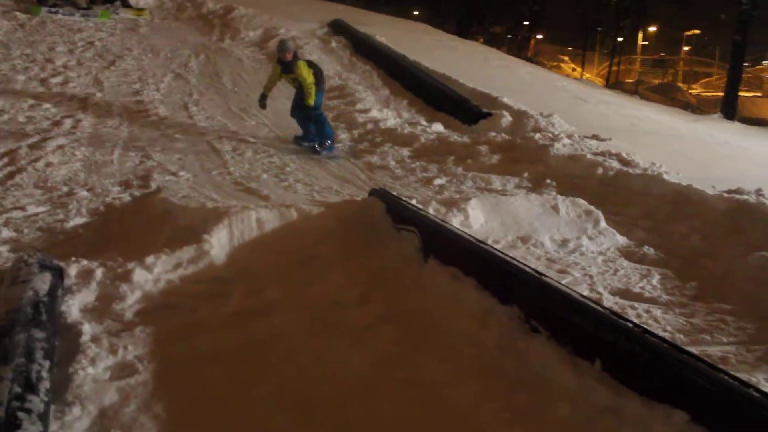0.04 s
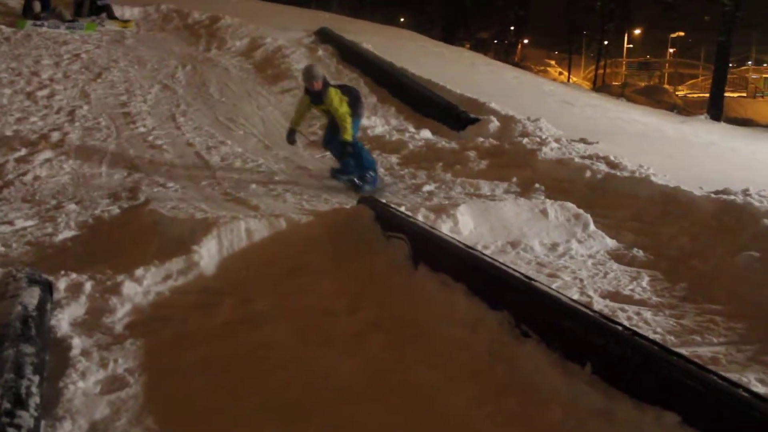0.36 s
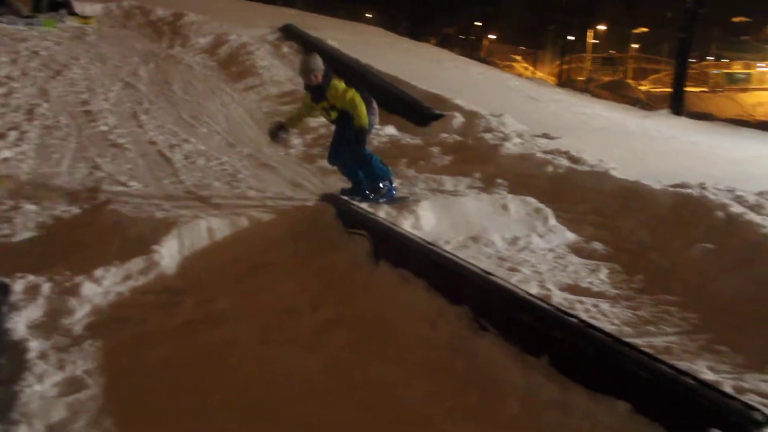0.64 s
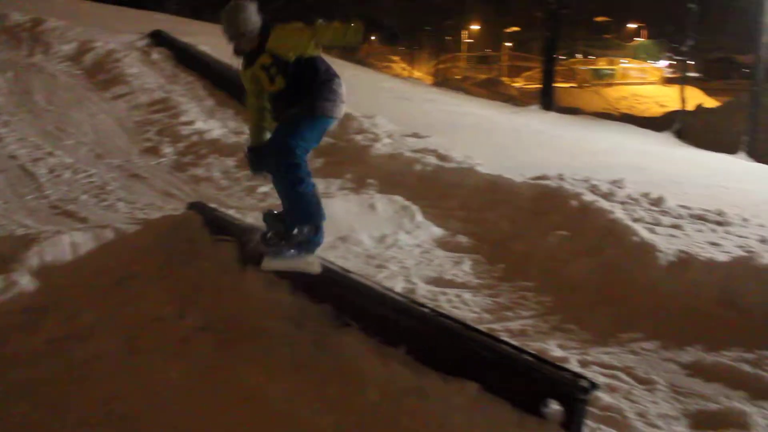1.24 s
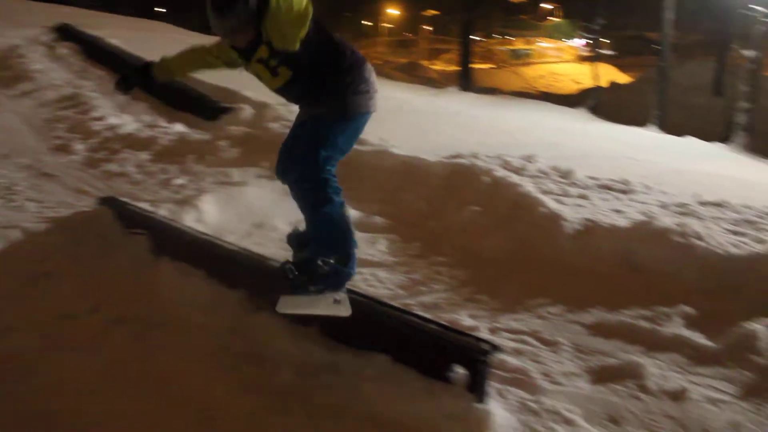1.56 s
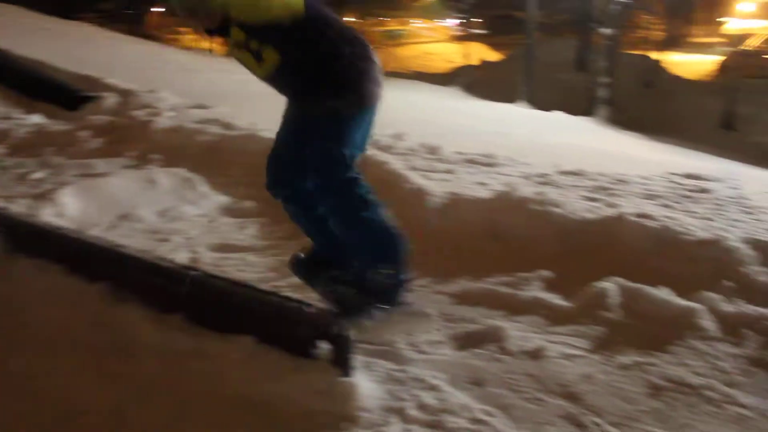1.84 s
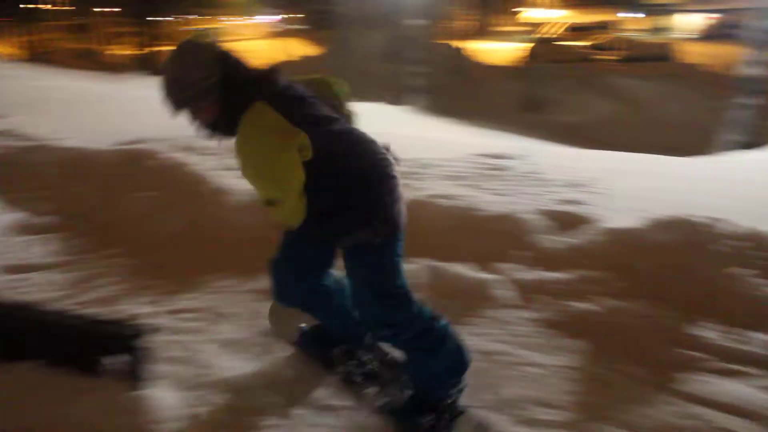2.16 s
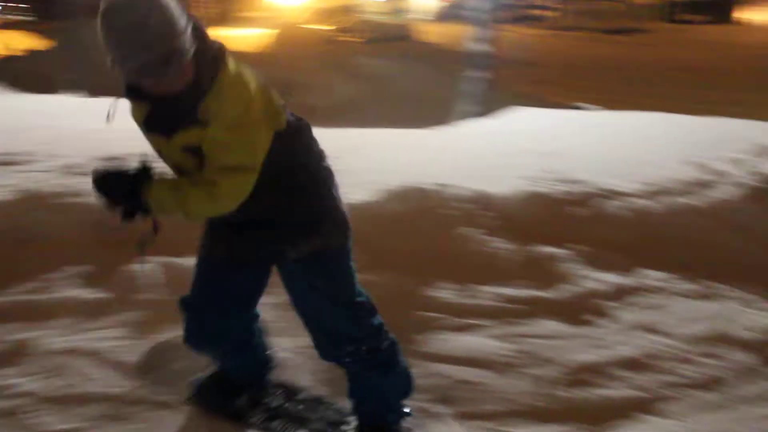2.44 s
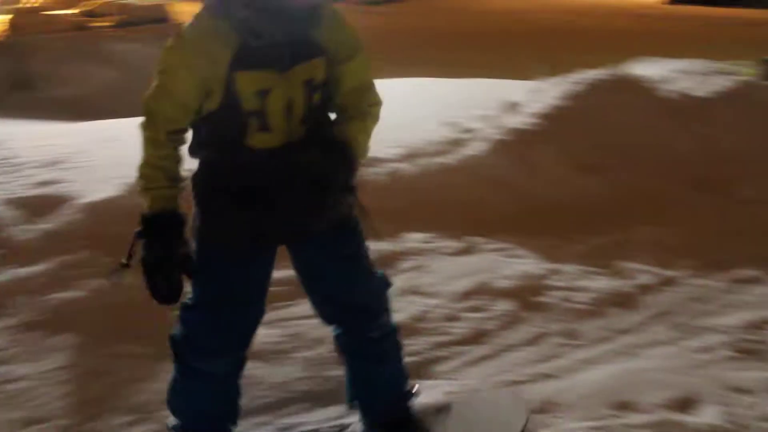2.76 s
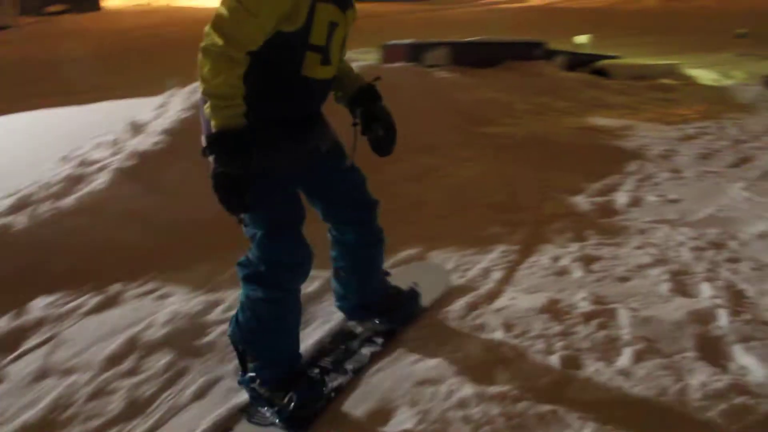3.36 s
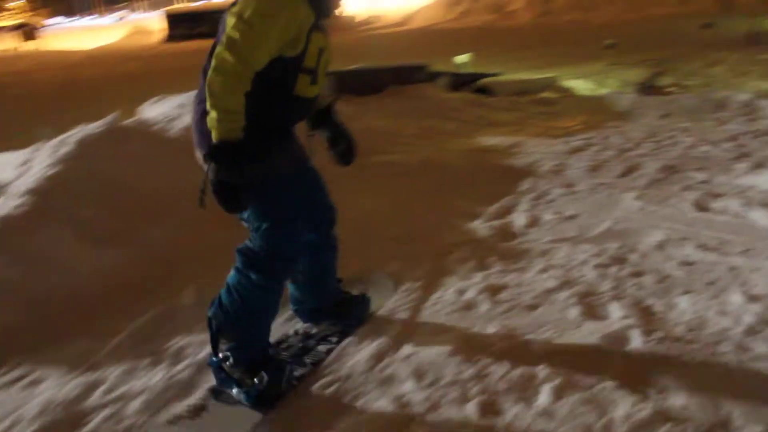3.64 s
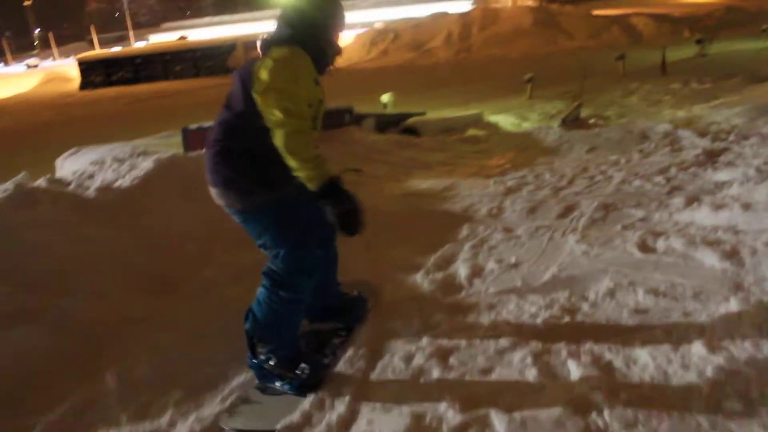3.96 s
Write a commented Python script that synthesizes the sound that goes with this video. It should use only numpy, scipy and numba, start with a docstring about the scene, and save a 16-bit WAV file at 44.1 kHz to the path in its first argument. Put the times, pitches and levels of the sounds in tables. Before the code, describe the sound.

Out in the open air, a snowboard glides closer with creaking bindings, hits a rail and slides along it with a growing scrape. A heavy landing follows, then gritty carving and spraying snow right beside the wind-buffeted microphone.

```python
"""A snowboard hisses and rumbles over hard snow toward a close listener, jumps onto a box rail,
scrapes along it, lands and skids away. Snow and rail are grainy friction; boots and bindings
creak in runs of tiny slips as the weight shifts. The knocks on the rail and the landing thud
overload the microphone, and wind buffets it as the rider passes. Open night air, no room."""
import sys
import numpy as np
from scipy import signal
from scipy.fft import rfft, irfft
from scipy.io import wavfile
from numba import njit

SR = 44100
rng = np.random.default_rng(int(sys.argv[2]) if len(sys.argv) > 2 else 0)


def output_pcm(signal):
    """Save a mono or channel-first signal as 16-bit PCM at the path in sys.argv[1].

    Samples are clipped to [-1, 1] before scaling.
    """
    pcm = np.clip(np.atleast_2d(signal).T, -1, 1) * 32767
    wavfile.write(sys.argv[1], SR, np.round(pcm).astype(np.int16))


N = 176400
T = np.arange(N) / SR
SHORT = T[:8192]  # time axis of one hit


def from_db(db):
    """Decibels to gain."""
    return 10 ** (np.asarray(db) / 20)


def rms_one(x):
    """Scale to unit power."""
    return x / np.sqrt(np.mean(x ** 2) + 1e-20)


def peak_at(x, db):
    """Scale to a peak level."""
    return from_db(db) * x / np.abs(x).max()


def level(rows, column=1, fade_s=0.0064):
    """Fader ride along a dB curve, dying away beyond its ends."""
    rows = np.array(rows)
    outside_s = np.maximum(0, np.maximum(rows[0, 0] - T, T - rows[-1, 0]))
    return from_db(np.interp(T, rows[:, 0], rows[:, column])) * np.exp(-outside_s / fade_s)


def add(out, start_s, sound):
    """Mix a sound in at a time."""
    i = int(np.clip(start_s * SR, 0, N - 1))
    out[i:i + len(sound)] += sound[:N - i]


def drift(hz):
    """Slow random wander of about unit spread."""
    hop, warm_up = 40, 2000
    r = np.exp(-2 * np.pi * hz * hop / SR)
    noise = rng.standard_normal(N // hop + warm_up + 2)
    slow = signal.lfilter([1], [1, -2 * r, r * r], noise)[warm_up:]
    return np.interp(np.arange(N) / hop, np.arange(len(slow)), rms_one(slow))


def colour(x, points):
    """Minimum-phase EQ through (Hz, dB) points, rolling off beyond them; unit power."""
    hz, db = np.transpose(points)
    f = np.maximum(np.arange(N // 2 + 1) * SR / N, 1)
    gain = from_db(np.interp(np.log(f), np.log(hz), db))
    gain /= np.hypot(1, (hz[0] / 2 / f) ** 2) * np.hypot(1, (f / hz[-1] / 2) ** 2)
    cepstrum = irfft(np.log(gain), N)
    cepstrum[N // 2:] = 0  # no ringing ahead of an attack
    return rms_one(irfft(rfft(x) * np.exp(2 * rfft(cepstrum)), N))


def lowpass(x, hz):
    """Soften above a frequency."""
    return signal.sosfilt(signal.butter(2, hz, fs=SR, output="sos"), x + 1e-18)


def resonate(x, hz, width_hz):
    """Two-pole resonance, gain 1 at its peak."""
    r = np.exp(-np.pi * width_hz / SR)
    feedback = [1, -2 * r * np.cos(2 * np.pi * hz / SR), r * r]
    return signal.lfilter(np.array([1, 0, -1]) * (1 - r * r) / 2, feedback, x + 1e-18)


@njit
def sweep(x, hz, width_hz):
    """Resonance whose centre follows a curve."""
    r = np.exp(-np.pi * width_hz / SR)
    state, out = 0j, np.zeros(len(x))
    for i in range(len(x)):
        state = x[i] + r * np.exp(2j * np.pi * hz[i] / SR) * state
        out[i] = 2 * (1 - r) * state.real
    return out


def wavering_ring(x, resonances_hz, width_hz, detune=0.035, swell_db=4):
    """Resonances that each swell, fade and shift as the contact point travels; unit power."""
    out = np.zeros(N)
    for hz in resonances_hz:
        centre_hz = hz * np.exp(detune * drift(hz=5))
        out += sweep(x, centre_hz, width_hz) * from_db(swell_db * drift(hz=6.5))
    return rms_one(out)


def friction(eq, grains_per_s, spread_db, grit, flutter_db, flutter_hz):
    """Grains on smooth hiss, fluttering with contact pressure; grit is the grains' share of power."""
    sizes = from_db(spread_db * np.minimum(rng.exponential(1, N), 4)) * rng.choice([-1, 1], N)
    grains = rms_one(sizes * (rng.random(N) < grains_per_s / SR))
    force = np.sqrt(grit) * grains + np.sqrt(1 - grit) * rng.standard_normal(N)
    return colour(force * from_db(flutter_db * drift(flutter_hz)), eq)


# Tone of the night air. Each row: frequency in Hz, relative level in dB.
AIR_EQ = [(25, -4.5), (500, -8), (1500, -24.5), (5000, -40), (16000, -20)]
# Swell of wind on the microphone. Each row: time in seconds, level in dB.
WIND_LEVELS = [(2.4, -47), (2.62, -35), (2.7, -26.5), (2.82, -28.5), (2.94, -29.5), (3.12, -34),
               (3.33, -50), (3.45, -39), (4, -41.5)]


def air():
    """A faint outdoor bed, and low buffeting as the rider passes."""
    gust_eq = [(25, -5), (50, 0), (95, 4.5), (150, -3.5), (260, -13)]
    gusts = colour(rng.standard_normal(N), gust_eq)
    bed = colour(rng.standard_normal(N), AIR_EQ)
    return from_db(-52) * bed + gusts * level(WIND_LEVELS)


# Lone snaps of crust and bindings. Each row: start in seconds, peak in dB, resonance in Hz.
SNAP_HITS = [(0.223, -18.5, 2830), (0.58, -20, 7400), (0.921, -16, 3200), (1.07, -23.5, 1980),
             (2.135, -12.5, 1010), (2.151, -13.5, 1720), (2.592, -6, 1720), (3.019, -6.5, 770),
             (3.2852, -13, 1310), (3.3152, -9, 1140), (3.332, -10, 1440), (3.362, -8.5, 1350),
             (3.756, -13, 2610), (3.937, -9, 720)]


def snaps(tail_db=-10.5, tail_s=0.00093):
    """Dry cracks: a sudden release and a brief scatter through one broad resonance."""
    out = np.zeros(N)
    for start, db, hz in SNAP_HITS:
        click = from_db(tail_db) * rng.standard_normal(len(SHORT)) * np.exp(-SHORT / tail_s)
        click[0] = 1
        snap = lowpass(resonate(click, hz, width_hz=hz), 2 * hz)
        add(out, start, peak_at(snap, db))
    return out


# Creaks of the bindings, and of the board on the rail during the slide. Each row: start in seconds, length in
# seconds, slips per second, level in dB, # main resonance in Hz, treble lift in dB.
CREAK_RUNS = [(0.402, 0.039, 218, -24, 2700, 7), (0.558, .02, 152, -19, 2970, 12),
              (.728, 0.04, 65, -14.5, 2820, 9), (0.779, 0.04, 119, -16, 2720, 6.5),
              (0.9435, 0.024, 220, -13.5, 2700, 15), (0.9812, .042, 213, -12, 2850, 10.5),
              (1.582, 0.0234, 156, -10.5, 3060, 8), (1.672, .062, 159, -12, 2900, 8),
              (2.023, 0.037, 230, -20, 2700, -7), (2.058, .009, 550, -12, 1860, 2),
              (3.502, 0.054, 121, -14.5, 2430, 0), (3.5675, 0.07, 137, -12, 2564, 2),
              (3.756, 0.035, 310, -13, 2300, 5), (3.803, 0.054, 258, -13, 2362, -9),
              (3.857, .028, 152, -10, 2370, -1)]
# The honk of a slip. Each row: multiple of the main resonance, relative level in dB.
SLIP_PEAK_EQ = [(.76, -12), (.92, 4), (1.12, 5.5), (1.4, -4.5)]
# Its body, its top end and its dull tail. Each row: frequency in Hz, relative level in dB.
SLIP_BODY_EQ = [(500, -5), (1400, 0)]
SLIP_TREBLE_EQ = [(5500, -10), (7700, -13), (9400, -13.5), (11500, -22.5)]
SLIP_TAIL_EQ = [(600, -3.5), (2600, -5), (3700, -17), (12000, -40)]


def creaks(tail_db=-10, tail_s=0.0026, jitter=0.08, spread_db=1.3):
    """Bindings, and the board on the rail, stick and slip in nearly regular runs, each repeating one bright
    tick and its tail."""
    out = np.zeros(N)
    scatter = colour(rng.standard_normal(N), SLIP_TAIL_EQ)
    for row, (start, length, rate, db, hz, treble_db) in enumerate(CREAK_RUNS):
        peak = [(multiple * hz, g) for multiple, g in SLIP_PEAK_EQ]
        treble = [(f, g + treble_db) for f, g in SLIP_TREBLE_EQ]
        tick = colour(signal.unit_impulse(N), sorted(SLIP_BODY_EQ + peak + treble))[:len(SHORT)]
        tail = np.roll(scatter, row * len(SHORT))[:len(SHORT)] * np.exp(-SHORT / tail_s)
        slip = peak_at(tick, 0) + from_db(tail_db) * tail
        for k in range(int(np.ceil(length * rate))):
            late, strength = rng.standard_normal(2)
            onset = start + (k + jitter * late * (k > 0)) / rate
            add(out, onset, -from_db(db + spread_db * strength) * slip)
    return out


# Dull board thuds; the loudest is the landing. Each row: start in seconds, peak in dB, pitch in Hz.
THUD_HITS = [(.368, -26, 600), (.498, -21.5, 515), (0.519, -18.5, 490), (0.963, -24.5, 397),
             (1.008, -22, 420), (1.064, -22, 396), (1.225, -13, 129), (1.948, -8, 590), (2.132, -3.5, 259),
             (2.133, 2.5, 464), (2.143, -16, 274), (2.283, -19, 490), (2.711, -7.5, 121), (2.719, -6, 144),
             (2.759, -18.5, 255), (2.915, -12.5, 133), (2.961, -11.5, 169), (2.989, -10.5, 102),
             (3.137, -18, 330), (3.233, -21.5, 138), (3.541, -15.5, 196), (3.977, -9.5, 202.6)]


def thuds(attack_s=0.0015, ring_cycles=4.7):
    """Soft blows of the board, damped within a few cycles."""
    out = np.zeros(N)
    for start, db, hz in THUD_HITS:
        envelope = (1 - np.exp(-SHORT / attack_s)) * from_db(-60 * SHORT * hz / ring_cycles)
        add(out, start, peak_at(envelope * np.sin(2 * np.pi * hz * SHORT), db))
    return out


# Nose and board hit the rail, then the tail leaves it.
# Each row: start in seconds, ring gain in dB, contact cut-off in Hz, crack gain in dB.
RAIL_HITS = [(1.2131, 4, 3000, -9.5), (1.2225, -2, 1800, -25), (1.227, 0.5, 1490, -9.5),
             (1.9412, 0.5, 2850, -0.5)]
# Ring of the board on the rail. Each row: pitch in Hz, relative level in dB, seconds to fall 60 dB.
BOARD_MODES = [(242, -23, 0.076), (425, -16, 0.067), (561, -13, 0.063), (700, -11.5, 0.028),
               (3310, -12, 0.035), (1195, -3.5, 0.021), (1447, -20, 0.057), (2344, 0.5, 0.013),
               (3490, -14, 0.022)]
# Tone of the crack. Each row: frequency in Hz, relative level in dB.
CRACK_EQ = [(200, -13.5), (900, 2), (2500, -5), (5000, -8), (8000, -18.5), (16000, -34)]


def knocks(crack_s=0.0057, spread_db=0.69, low_cut_hz=160):
    """Hard blows on the rail: a crack and the short ring of the loaded board."""
    rings, crack_envelope = np.zeros(N), np.zeros(N)
    for start, ring_db, contact_hz, crack_db in RAIL_HITS:
        strengths = from_db(rng.normal(0, spread_db, len(BOARD_MODES)))
        strengths *= rng.choice([-1, 1], len(BOARD_MODES))
        ring = sum(strength * from_db(db - 60 * SHORT / t60) * np.sin(2 * np.pi * hz * SHORT)
                   for strength, (hz, db, t60) in zip(strengths, BOARD_MODES))
        add(rings, start, from_db(ring_db) * lowpass(ring, contact_hz))
        add(crack_envelope, start, from_db(crack_db) * np.exp(-SHORT / crack_s))
    cracks = crack_envelope * colour(rng.standard_normal(N), CRACK_EQ)
    return signal.sosfilt(signal.butter(2, low_cut_hz, "high", fs=SR, output="sos"), rings + cracks)


# The slide builds along the rail. Each row: time in seconds, scrape in dB, rumble in dB.
SLIDE_LEVELS = [(1.25, -40, -36), (1.31, -34, -30.5), (1.39, -36, -35.5), (1.445, -30.5, -30),
                (1.57, -27.5, -25), (1.62, -26.5, -34.5), (1.7, -24, -27), (1.755, -28.5, -26.5),
                (1.79, -27.5, -20.5), (1.87, -21.5, -29), (1.937, -20, -29)]
# The steel edge sings. Each row: time in seconds, level in dB.
SING_LEVELS = [(1.765, -55), (1.785, -23), (1.81, -60), (1.88, -44), (1.937, -38)]
# Tone of the scrape and of the box under it. Each row: frequency in Hz, relative level in dB.
SCRAPE_EQ = [(500, -7.5), (1200, 2), (2000, 0), (3000, 0.5), (4400, -3), (6500, -12), (10000, -21),
             (16000, -27.5)]
RUMBLE_EQ = [(60, -31), (150, -5.5), (350, -2), (520, 4.5), (2000, -16.5)]
# Resonances of rail and board that the scraping keeps alive, in Hz.
RAIL_MODES_HZ = [500, 1140, 1310, 1880, 2600, 3160]


def rail_slide():
    """The base catches on the rough rail, the box rumbles, and the edge sings near the end."""
    scrape = friction(SCRAPE_EQ, grains_per_s=1300, spread_db=2.3, grit=0.7,
                      flutter_db=2.2, flutter_hz=45)
    rumble = friction(RUMBLE_EQ, grains_per_s=600, spread_db=0, grit=0.65,
                      flutter_db=2.2, flutter_hz=29.8)
    ring = from_db(-20) * wavering_ring(scrape + rumble, RAIL_MODES_HZ, width_hz=130)
    sing = rms_one(resonate(scrape, hz=4160, width_hz=270))
    return ((scrape + ring) * level(SLIDE_LEVELS) + rumble * level(SLIDE_LEVELS, column=2)
            + sing * level(SING_LEVELS))


# The flat base glides on packed snow on the run-in and run-out; the loaded board churns deeper snow
# after landing and through the turn. Each row: time in seconds, level in dB.
GLIDE_LEVELS = [(0, -44.5), (.13, -49), (.23, -35), (.33, -32.5), (.42, -36), (.47, -49), (.52, -35),
                (.63, -45), (.8, -40), (1.02, -44), (1.1, -49), (1.2, -37), (1.3, -49), (3.42, -41.5),
                (3.62, -24), (3.73, -29.5), (3.785, -19), (3.83, -35), (3.91, -28.5), (4, -31.5)]
CHURN_LEVELS = [(2.02, -44), (2.1, -28), (2.15, -22.5), (2.19, -31.5), (2.38, -35.5), (2.52, -22.5),
                (2.59, -19), (2.65, -35.5), (2.72, -20), (2.8, -35), (2.93, -24.5), (3.02, -38),
                (3.07, -22), (3.145, -21.5), (3.17, -33.5), (3.4, -47)]
# Tone of the glide and of the darker churn. Each row: frequency in Hz, relative level in dB.
GLIDE_EQ = [(70, -16), (150, -3), (330, -6), (560, -0.5), (1200, -16), (6000, -36)]
CHURN_EQ = [(60, -19.5), (130, -1.5), (230, 2.5), (900, -9.5), (1400, -17.5), (6000, -34)]


def base_grind():
    """The low end of the ride: the base grinds over the crust and churns the snow."""
    texture = dict(grains_per_s=900, spread_db=2.5, grit=0.5, flutter_db=2.2, flutter_hz=59)
    glide = friction(GLIDE_EQ, **texture)
    churn = friction(CHURN_EQ, **texture)
    return glide * level(GLIDE_LEVELS) + churn * level(CHURN_LEVELS)


# The carve after landing. Each row: time in seconds, level in dB, centre of the sweep in Hz.
CARVE_MOVES = [(2.38, -42.5, 1500), (2.52, -26.5, 2100), (2.63, -34, 2400), (2.675, -33, 3000),
               (2.81, -22.5, 6900), (2.85, -21, 4400), (2.88, -25, 11100), (2.9, -30, 6100),
               (2.98, -26.5, 8700), (3.06, -35, 5500)]
# Tone of the thrown snow. Each row: frequency in Hz, relative level in dB.
CARVE_EQ = [(1000, 3.5), (3600, -6), (5000, -2), (11000, -6.5), (16000, -13.5)]


def carve():
    """The edge digs in and throws a bright fan of snow, with a resonance sweeping through it."""
    fan = friction(CARVE_EQ, grains_per_s=4700, spread_db=11, grit=0.34, flutter_db=0.4, flutter_hz=35)
    times, _, hz = np.transpose(CARVE_MOVES)
    ring = from_db(-9) * rms_one(sweep(fan, np.interp(T, times, hz), width_hz=920))
    return rms_one(fan + ring) * level(CARVE_MOVES)


# Snow hiss under the board, ducked in the air and on the rail. Each row: time in seconds, level in dB.
SPRAY_LEVELS = [(0, -46.5), (.3, -41), (.66, -46), (.8, -37.5), (1.01, -41), (1.04, -51.5), (1.98, -46),
                (2.11, -28.5), (2.18, -34.5), (2.4, -33.5), (2.6, -23.5), (3.0, -35.5), (3.23, -35.5),
                (3.34, -27), (3.44, -35), (3.67, -30.5), (3.74, -36), (3.78, -22.5), (3.91, -33.5),
                (4, -30.5)]
# Tone of the hiss. Each row: frequency in Hz, relative level in dB.
SPRAY_EQ = [(600, -2.5), (1300, 8), (1800, 4), (2300, 4.5), (3700, 1.5), (6500, 1.5), (12000, -8.5),
            (16000, -13.5)]


def snow_spray():
    """Crystals hiss and spray from the board, coloured by broad resonances of the edge in the snow."""
    hiss = friction(SPRAY_EQ, grains_per_s=2500, spread_db=7, grit=0.3, flutter_db=2.2, flutter_hz=40)
    ring = from_db(-5) * wavering_ring(hiss, np.geomspace(1480, 7070, 6), width_hz=1700)
    return rms_one(hiss + ring) * level(SPRAY_LEVELS)


def scene():
    """The whole ride, in mono."""
    snow = snow_spray() + carve() + base_grind()
    return (snow + rail_slide() + creaks() + snaps() + thuds() + knocks() + air())[None]


def record(dry):
    """The loudest blows clip, then a steep filter cuts the top above 16 kHz."""
    high_cut = signal.ellip(10, 0.1, 80, 16000, fs=SR, output="sos")
    return signal.sosfilt(high_cut, np.clip(dry, -1, 1))


dry = scene()
out = record(dry)
output_pcm(out)
```